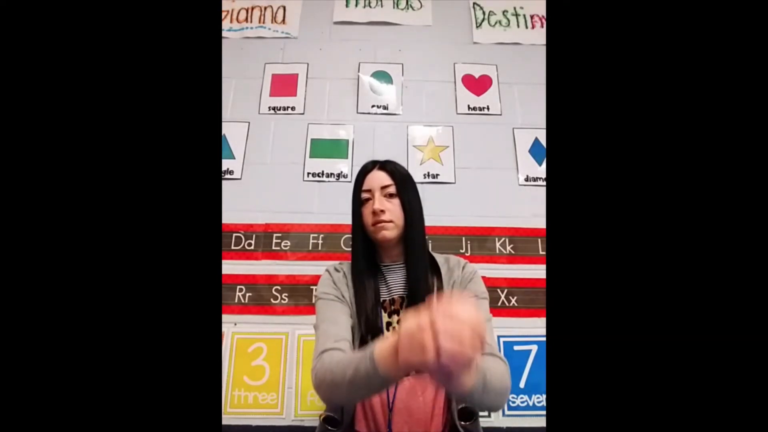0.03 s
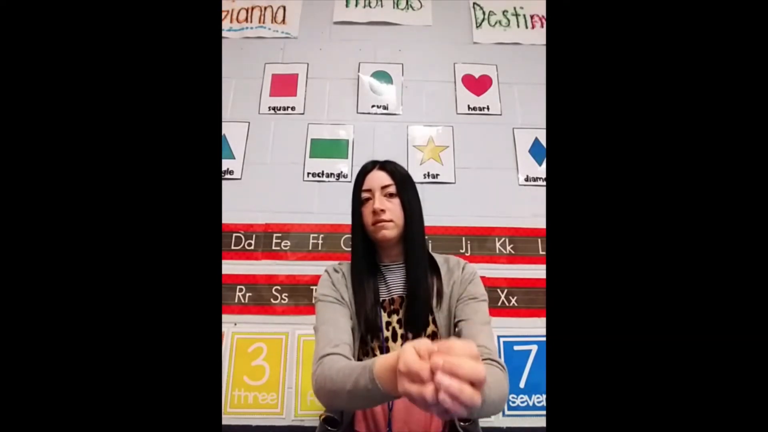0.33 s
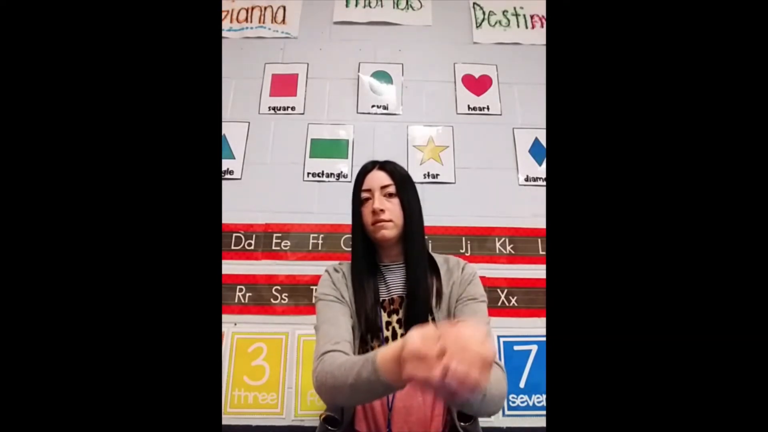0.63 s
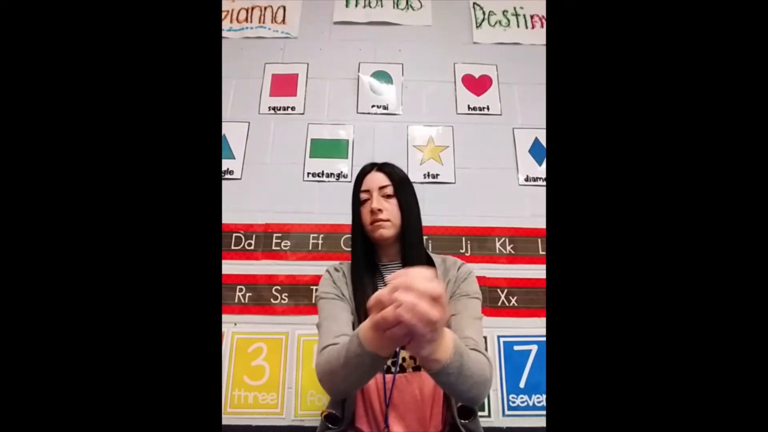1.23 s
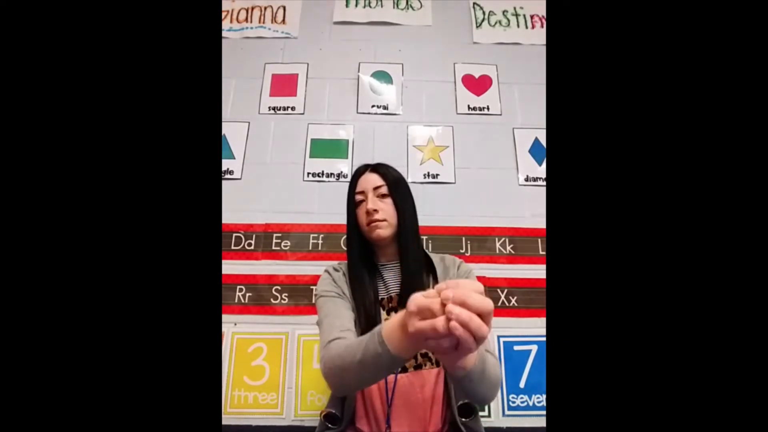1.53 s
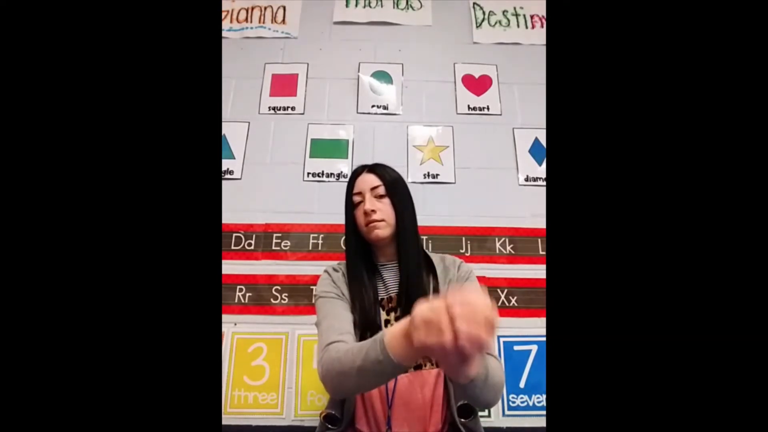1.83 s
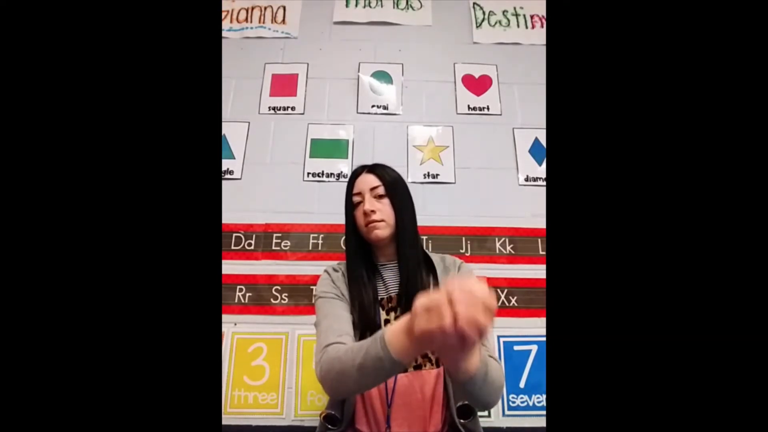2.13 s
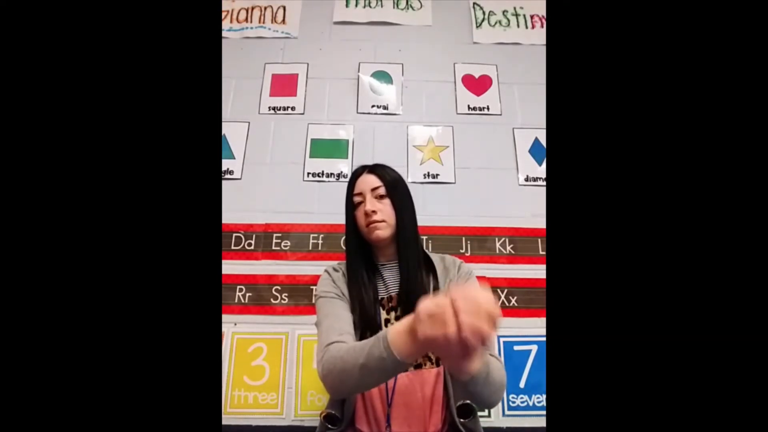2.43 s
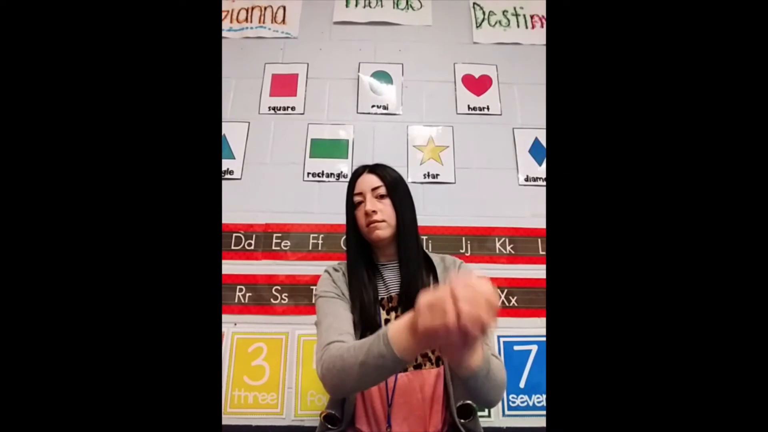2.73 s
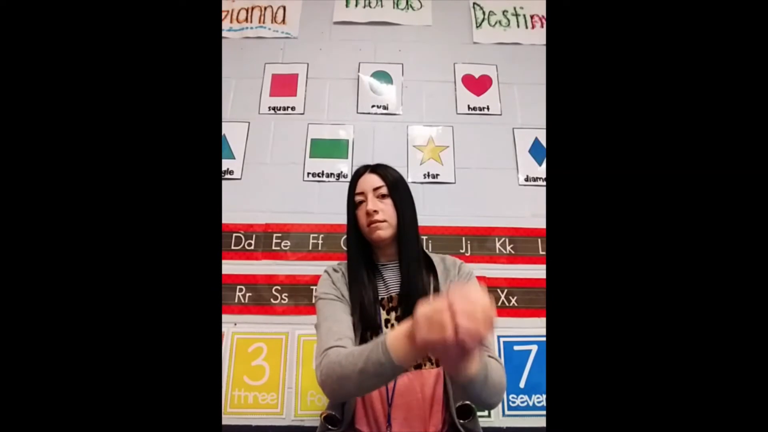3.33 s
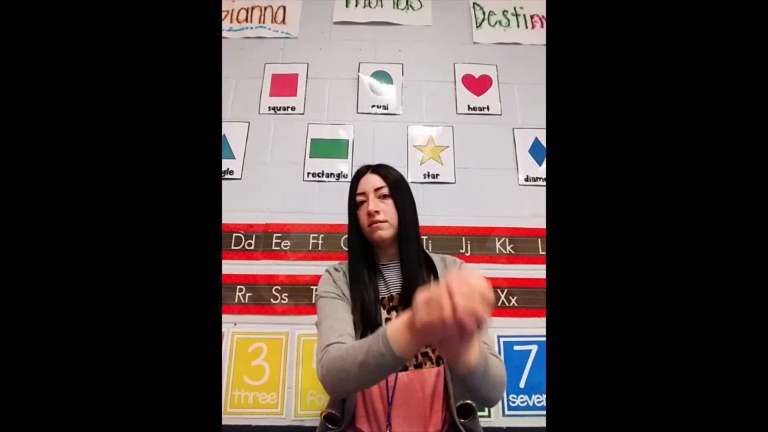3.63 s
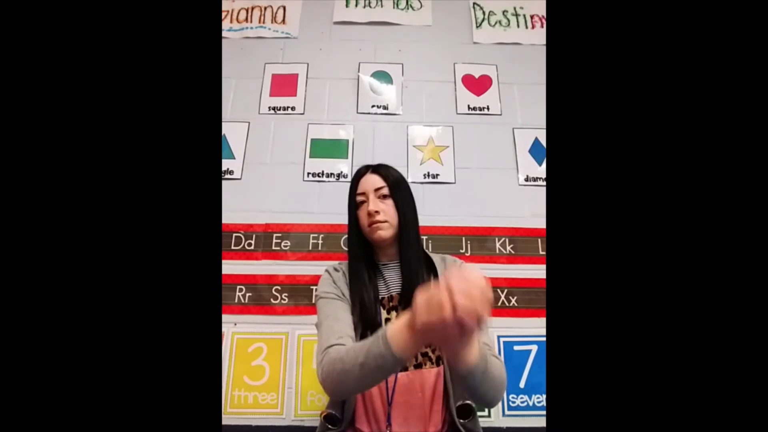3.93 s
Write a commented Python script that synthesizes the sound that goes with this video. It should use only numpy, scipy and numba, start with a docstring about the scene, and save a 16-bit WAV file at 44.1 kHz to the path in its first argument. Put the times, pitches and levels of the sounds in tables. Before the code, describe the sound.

Coins jingle in cupped hands, close by in a small quiet room. A light clink comes at about 0.1 seconds and a sharper shake at 0.8. From around 1.3 seconds the shaking settles into a quicker rhythm, about three bursts a second, the coins sliding and clattering into a palm. It peaks near 3.5 seconds, with another shake at 3.8. A faint ventilation rumble slowly fades underneath.

```python
"""Coins jingle in cupped hands, shaken close by in a small quiet room and heard almost in mono.
On each swing they slide over each other, then pile into a palm. Every impact gives a broadband crack
and excites briefly ringing modes of the discs, while the air between the hands resonates as a cavity.
A low ventilation rumble lies underneath."""
import sys
import numpy as np
from scipy import signal
from scipy.fft import rfft, irfft
from scipy.io import wavfile
from scipy.ndimage import uniform_filter1d
from numba import njit

SR = 44100
rng = np.random.default_rng(int(sys.argv[2]) if len(sys.argv) > 2 else 0)


def write(x):
    x = np.atleast_2d(x).T
    wavfile.write(sys.argv[1], SR, np.round(np.clip(x, -1, 1) * 32767).astype(np.int16))


N = 176400
HARD_TOUCH_S, SOFT_TOUCH_S = 0.00006, 0.00062  # build-up of a ring after a blow and after a graze
SLIDE_RISE_S, SLIDE_FALL_S, CLATTER_FALL_S = 0.004, 0.00303, 0.007

# Coin modes, damped by the skin. Each row: frequency in Hz, level in dB, 60 dB decay time in seconds.
HELD_MODES = [ (4710, -32.5, 0.042), (5440, -27.5, 0.083), (5880, -29, 0.045), (8300, -21, 0.05),
              (9040, -12.5, 0.043), (9230, -5.5, 0.038), (9416, -7, 0.014), (9900, -24, 0.011),
              (9900, -24, 0.047), (11300, -37, 0.074), (12700, -23.5, 0.027), (13740, -19.5, 0.048),
              (15500, -22, 0.029), (15900, -21.5, 0.028)]
# Spectrum of an impact. Each row: frequency in Hz, relative spectral density in dB.
CRACK_SPECTRUM = [(300, -36), (3850, -20.5), (4500, -1), (6200, 0.5), (7100, -7), (8400, -0.5),
                  (9900, -0.5), (11200, 4.5), (12500, -1), (14000, 2.5), (16000, 11)]
def coins():
    """Impacts excite a crack and free vibration; small discs radiate their low frequencies poorly."""
    dense, sparse = contacts(per_s=650, scatter_db=1), contacts(per_s=520, scatter_db=4.5)
    pile_blows, pile_ticks, hands = clatters(dense)
    clink_blows, clink_ticks = clinks()
    jingle, slide_ticks = slides(sparse)
    metal = strike(pile_blows + clink_blows, HELD_MODES, HARD_TOUCH_S) + jingle + clanks(dense)
    radiation = signal.butter(4, 3720, "highpass", fs=SR, output="sos")
    cracks = through(crack(pile_ticks + clink_ticks + slide_ticks), colour(CRACK_SPECTRUM))
    return signal.sosfilt(radiation, metal) + undb(-7.5) * cracks + hands


# Coins pile into a palm. Each row: peak time, build-up and hold in seconds, level in dB, relative crack
# level in dB, then relative level in dB and resonance in Hz for the finger gap and for the palm hollow.
PILE_UPS = [ (0.089, 0.0069, 0.019, -42, 2.5, -27, 2950, -31, 844),
            (0.127, 0.0005, 0.025, -37.5, 7.5, -24, 2880, -21, 880),
            (0.779, 0.0057, 0.022, -33.5, 1.5, -24, 2906, -29, 910),
            (1.357, 0.0087, 0.0067, -36.5, 2, -36, 3100, -16, 884),
            (1.424, 0.001, 0.023, -31.5, 7, -26.5, 3000, -39, 880),
            (1.704, 0.019, 0.037, -39, 6.5, -32, 3060, -32.5, 852),
            (1.926, 0.0086, 0.013, -37, 6, -32, 3000, -21, 958),
            (1.99, 0.0064, 0.023, -31.5, 4.5, -29.5, 3040, -32.5, 930),
            (2.265, 0.018, 0.0051, -44, 8.5, -24, 3230, -19.5, 957),
            (2.33, 0.011, 0.0063, -35, 7, -24.5, 2980, -28.5, 1020),
            (2.586, 0.02, 0.037, -37, 4, -25, 2950, -35, 1020),
            (2.89, 0.0094, 0.017, -38, 9.5, -19.5, 3120, -29, 910),
            (3.12, 0.0049, 0.004, -37, 7, -31, 3000, -19.5, 954),
            (3.179, 0.0059, .033, -37.5, 8.5, -24.5, 3100, -28, 990),
            (3.292, 0.00068, 0.012, -36.5, 2, -27, 3010, -36, 1120),
            (3.512, 0.018, 0.0032, -30.5, 8, -15.5, 3070, -32, 982),
            (3.785, 0.017, 0.013, -35.5, 7, -22, 3000, -30, 950)]
# Two air resonances. Each row: multiple of the resonant frequency, relative spectral density in dB.
GAP_RESONANCE = [(0.799, -50), (0.931, -1), (0.998, 7.5), (1.065, 1), (1.221, -33.5)]
PALM_RESONANCE = [(.4, -32.5), (.7, -11), (.86, -5), (1, 9), (1.2, -7.5), (2.0, -10.5), (2.6, -21.5),
                  (6, -19)]
def clatters(hits):
    """Dense collisions drive ring and crack, and force the enclosed air into resonance."""
    piles = np.array([swell(s, rise, hold, CLATTER_FALL_S) for s, rise, hold, *_ in PILE_UPS])
    *_, db, crack_db, gap_db, gap_hz, palm_db, palm_hz = np.array(PILE_UPS).T
    peaks = piles ** 1.66  # the finger gap sounds only at the height of a clatter
    gap = cavity(hits, peaks, db + gap_db, gap_hz, GAP_RESONANCE)
    palm = cavity(crack(hits), piles, db + palm_db, palm_hz, PALM_RESONANCE)
    return hits * mix(piles, db), hits * mix(piles, db + crack_db), gap + palm


# One coin strikes another. Each row: time in seconds, level in dB, relative crack level in dB.
SINGLE_IMPACTS = [ (.079, -42, -12), (.1295, -40, 4), (.772, -31, -8), (.787, -23.5, -15), (.803, -25, -6),
                  (.977, -33.5, -27), (1.067, -56.5, -2), (1.170, -58.5, -13), (1.357, -31, -14),
                  (1.4265, -36, 0), (1.471, -32, 10), (1.484, -31, -16), (1.795, -41, 20.5),
                  (1.807, -35.5, 7), (1.905, -34, -6), (1.928, -34, 1), (1.995, -24, 2),
                  (2.281, -27.5, -17), (2.3335, -27, -6), (2.464, -48.5, -23), (2.599, -27, -3),
                  (2.649, -30, -9), (2.660, -38.5, 11.5), (3.125, -37, 4), (3.249, -32, -4),
                  (3.291, -31.5, -3), (3.490, -34, 3), (3.512, -25, 10), (3.524, -20.5, -1),
                  (3.756, -30.5, -18), (3.978, -51.5, -8)]
def clinks():
    """An isolated collision acts as an impulse, here with the energy of 0.8 ms at its level."""
    blows, ticks = np.zeros((2, N))
    for s, db, crack_db in SINGLE_IMPACTS:
        blows[int(s * SR)], ticks[int(s * SR)] = undb([db, db + crack_db]) * np.sqrt(0.0008 * SR)
    return blows, ticks


# Coins slide over each other. Each row: start and length in seconds, level in dB, then the relative
# levels in dB of a loose large coin and a loose small coin.
SLIPS = [ (0.05, 0.042, -64, -33, -26), (0.131, 0.015, -49, 2, -5.5), (0.671, 0.086, -55.5, -23, -18),
         (0.956, 0.054, -54.5, -24, -28), (1.33, 0.13, -53.5, -7, -12.5), (1.63, 0.002, -61.5, -17, 5),
         (1.653, 0.15, -53, -5.5, -21), (1.886, 0.079, -50, -15, -25), (2.19, 0.055, -64, -23, -14),
         (2.218, 0.067, -47, -8, -41), (2.318, 0.022, -49, 5, -21), (2.468, 0.014, -57, -5, -22),
         (2.505, 0.1, -48, -6.5, -28), (2.614, 0.03, -56, -1, -13), (2.784, 0.042, -59, -8.5, -10.5),
         (2.826, 0.031, -49, -1.5, -38), (3.103, 0.025, -53.5, -6.5, -16), (3.203, .048, -53, -12, -24),
         (3.397, 0.03, -57.5, -14, -21), (3.437, 0.052, -45, -10.5, -30), (3.666, 0.051, -56.5, -35, -33),
         (3.979, 0.036, -51, -15, -17)]
# Lowest modes of loose coins. Each row: frequency in Hz, level in dB, 60 dB decay time in seconds.
LARGE_MODES = [(5195, -4, 0.042), (4730, -18, 0.0092)]
SMALL_MODES = [(6270, 0.0056, 0.099)]
def slides(hits, main_ring_hz=8900):
    """Grazing contacts tick and favour the main ring: other modes lose 3 dB per octave from it."""
    slips = np.array([swell(s, SLIDE_RISE_S, length, SLIDE_FALL_S) for s, length, *_ in SLIPS])
    *_, slip_db, large_db, small_db = np.array(SLIPS).T
    soft_modes = [(hz, db - 3 * abs(np.log2(hz / main_ring_hz)), t60) for hz, db, t60 in HELD_MODES]
    jingle = strike(hits * mix(slips, slip_db), soft_modes, SOFT_TOUCH_S)
    for db, modes in (large_db, LARGE_MODES), (small_db, SMALL_MODES):
        jingle += strike(hits * mix(slips, slip_db + db), modes, SOFT_TOUCH_S, detune=0.015)
    return jingle, hits * mix(slips, slip_db - 7)


# Coins land flat on each other. Each row: start and length in seconds, level in dB, pitch in Hz.
FLAT_LANDINGS = [(0.668, 0.037, -65.5, 4290), (1.348, 0.017, -42, 4420), (1.922, 0.029, -50.5, 4750),
                 (2.003, 0.011, -44.5, 6050), (2.889, 0.0056, -40.5, 4630), (3.117, 0.015, -55, 4340),
                 (3.188, 0.023, -47.5, 4580), (3.507, 0.0041, -45, 4780), (3.508, .005, -49, 5900)]
# Their modes. Each row: multiple of the pitch, level in dB, 60 dB decay time in seconds.
FLAT_MODES = [(1.002, -6, 0.022), (1.062, -10, 0.0083)]
def clanks(hits):
    """Face-to-face impact excites the lowest modes; the loudest pair of coins sets the pitch."""
    flats = np.array([undb(db) * swell(s, SLIDE_RISE_S, length, CLATTER_FALL_S)
                      for s, length, db, _ in FLAT_LANDINGS])
    hz = np.array(FLAT_LANDINGS)[flats.argmax(axis=0), -1]
    return strike(hits * flats.sum(axis=0), FLAT_MODES, SOFT_TOUCH_S, tuning=hz)


def contacts(per_s, scatter_db, steady_s=0.017):
    """A Poisson process of uneven impulses, scaled to carry a steady flow of energy."""
    hits = (rng.random(N) < per_s / SR) * undb(scatter_db * rng.standard_normal(N))
    hits *= rng.choice([-1, 1], N)
    power = uniform_filter1d(hits ** 2, int(steady_s * SR))
    return hits / np.sqrt(np.maximum(power, 1e-9))


def strike(hits, modes, touch_s, tuning=1, detune=0.014, drift=0.01573, spread_db=3.5):
    """Modal superposition: each contact excites its own mix of modes, detuned by the grip."""
    out, at = 0, np.nonzero(hits)[0]
    grip_index = (at / SR / 0.05).astype(int)  # modes drift every 50 ms as the coins change places
    for hz, db, t60 in modes:
        sign, size, shift = rng.standard_normal((N, 3), dtype=np.float32)[at].T
        grip = rng.standard_normal(N, dtype=np.float32)[grip_index]
        push, pitch = np.zeros((2, N))
        push[at] = hits[at] * np.sign(sign) * undb(db + spread_db * size)
        pitch[at] = hz * (1 + detune * shift + drift * grip)
        out = out + ring(push, pitch * tuning, float(t60), float(touch_s))
    return out


@njit
def ring(hits, hz, t60, touch_s):
    """A damped oscillator: each contact starts a sine that builds quickly and decays exponentially."""
    out = np.zeros(len(hits))
    decay = np.log(1000) / (t60 * SR)
    onset = 1 - np.exp(-np.arange(int(t60 * SR)) / (touch_s * SR))
    for i in np.nonzero(np.abs(hits) > 1e-5)[0]:
        phasor = 2 * np.sqrt(decay) * hits[i] + 0j
        pole = np.exp(2j * np.pi * hz[i] / SR - decay)
        for k in range(min(len(onset), len(hits) - i)):
            out[i + k] += phasor.imag * onset[k]
            phasor *= pole
    return out


def crack(hits, decay_s=0.0018):
    """Scattering through the pile spreads each impulse into a very short burst of noise."""
    tail = np.exp(-np.arange(SR // 50) / SR / decay_s) ** 2
    power = signal.fftconvolve(hits ** 2, tail / tail.sum())[:N]
    return np.sqrt(np.abs(power)) * rng.standard_normal(N)


def cavity(drive, envelopes, levels_db, pitches_hz, shape):
    """Cavity resonance: the air in the hands has a slightly different pitch on every swing."""
    return sum(undb(db) * through(drive * envelope, colour([(hz * k, gain) for k, gain in shape]))
               for envelope, db, hz in zip(envelopes, levels_db, pitches_hz))


def room(x, t60=0.17, delay_s=0.0032, early_s=0.008):
    """Reverberation: a short, almost mono tail; very faint early reflections add a little width."""
    t = np.arange(SR // 2) / SR
    fade = np.exp(-np.log(1000) * t / t60) * (t > delay_s)
    mid, side = (undb(-7) * through(x, fade * rng.standard_normal(len(t))) for _ in range(2))
    early = through(x, np.exp(-t / early_s) * rng.standard_normal(len(t)))
    return stereo(x + mid, 0.03 * side + undb(-46.5) * early)


# Rumble spectra, mid and side. Each row: frequency in Hz, relative spectral density in dB.
VENT_MID = [(24, -36.5), (40, -5.5), (60, 1), (100, 3.5), (135, -4), (200, -10.5), (320, -16), (550, -24),
            (880, -20), (1400, -27), (2400, -35.5), (6000, -45), (16000, -67)]
VENT_SIDE = [(60, -24.5), (140, -1), (600, -11), (1500, -23.5), (8000, -9)]
# Hum tones. Each row: frequency in Hz, level in dB relative to the rumble.
VENT_TONES = [(97, -7), (220.5, -20)]
# The steady background rumble and hum are slowly turned down. Each row: time in seconds, level in dB.
BACKGROUND_FADE = [(0, -61), (1.55, -61.5), (1.85, -62.5), (2.5, -64.5), (4, -68)]
def ventilation(waver_hz=2.477, hiss_db=-75.5):
    """Low broadband noise and a frequency-modulated hum, slowly turned down over a faint, even hiss."""
    t = np.arange(N) / SR
    mid, side = (unit(through(rng.standard_normal(N), colour(points, size=16384)))
                 for points in (VENT_MID, VENT_SIDE))
    for hz, db in VENT_TONES:
        waver = waver_hz * np.interp(t, np.linspace(0, N / SR, num=16), rng.standard_normal(16))
        mid = mid + undb(db) * np.sqrt(2) * np.sin(2 * np.pi * np.cumsum(hz + waver) / SR)
    fade = undb(np.interp(t, *np.array(BACKGROUND_FADE).T))
    return fade * stereo(flutter(mid), 0.12 * side) + undb(hiss_db) * rng.standard_normal(N)


def flutter(x, depth_db=2.5, per_s=11):
    """Amplitude modulation: half-octave bands from 160 to 1280 Hz swell and sink independently."""
    spectrum, octave = rfft(x), np.log2(np.arange(N // 2 + 1) * SR / N + 1)
    steps = np.arange(N) / SR * per_s
    knots = int(steps[-1]) + 2
    for centre in np.log2(160) + np.arange(7) / 2:
        band = irfft(spectrum * np.maximum(1 - 2 * abs(octave - centre), 0), N)
        wander = np.interp(steps, np.arange(knots), rng.standard_normal(knots))
        x = x + band * (undb(depth_db * wander) - 1)
    return x


def swell(peak_s, rise, hold, fall):
    """An envelope of exponential growth, hold and exponential decay."""
    t = np.arange(N) / SR - peak_s
    return np.exp(np.minimum(t, 0) / max(rise, 1 / SR) - np.maximum(t - hold, 0) / fall)


def mix(envelopes, db):
    """Incoherent movements add in power."""
    return np.sqrt(undb(2 * db) @ envelopes ** 2)


def colour(points, size=2048):
    """Minimum-phase response for a spectrum of (Hz, dB) points."""
    hz, db = np.array(points).T
    log_hz = np.log(np.arange(size // 2 + 1) * SR / size + 1)
    cepstrum = irfft(np.log(undb(np.interp(log_hz, np.log(hz), db))))
    cepstrum[1:size // 2] *= 2
    cepstrum[size // 2 + 1:] = 0
    return irfft(np.exp(rfft(cepstrum)))


def through(x, response):
    """Convolution with a response of unit energy."""
    return signal.fftconvolve(x, response / np.linalg.norm(response))[:N]


def stereo(mid, side):
    """Left is the sum, right the difference."""
    return np.array([mid + side, mid - side])


def undb(db):
    """Decibels to amplitude ratio."""
    return 10 ** (np.asarray(db) / 20)


def unit(x):
    """Normalisation to an rms of 1."""
    return x / np.sqrt(np.mean(x ** 2))


def scene():
    """Superposition of the coins in the room and the ventilation."""
    return room(coins()) + ventilation()


def record(dry, top_hz=15750):
    """A steep low-pass filter removes the highest treble."""
    return signal.sosfilt(signal.ellip(10, .2, 70, top_hz, fs=SR, output="sos"), dry)


dry = scene()
out = record(dry)
write(out)
```